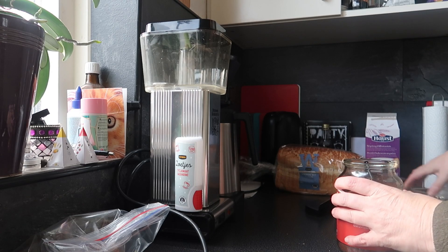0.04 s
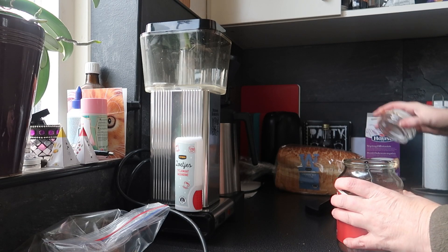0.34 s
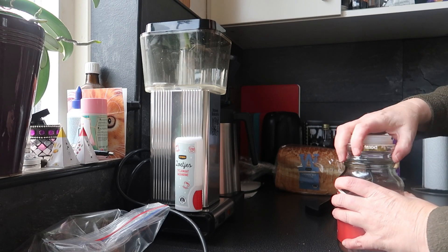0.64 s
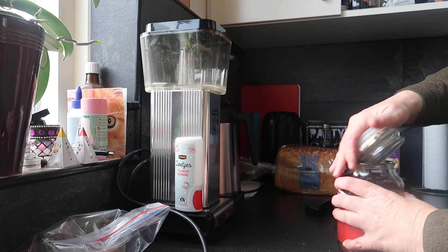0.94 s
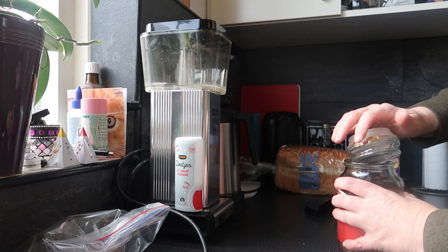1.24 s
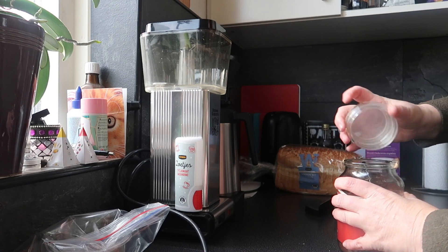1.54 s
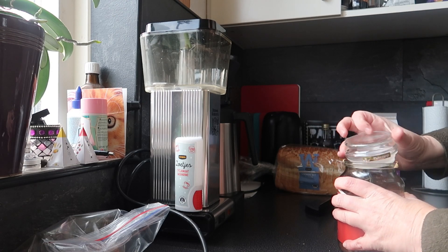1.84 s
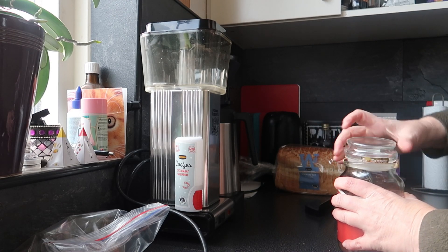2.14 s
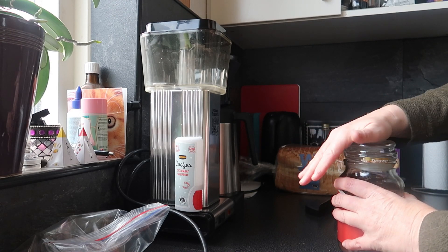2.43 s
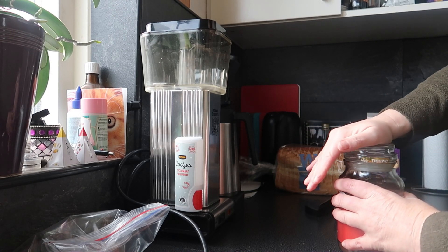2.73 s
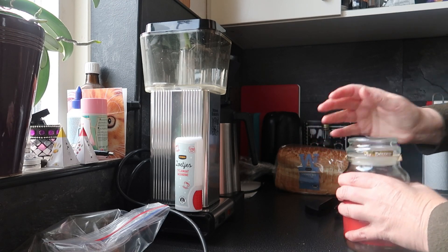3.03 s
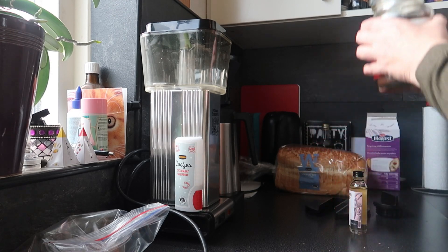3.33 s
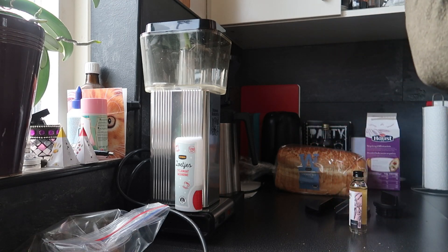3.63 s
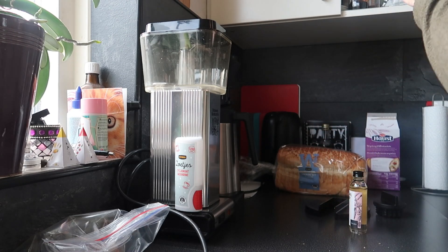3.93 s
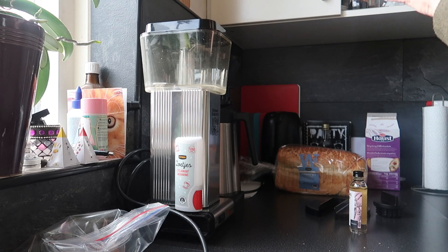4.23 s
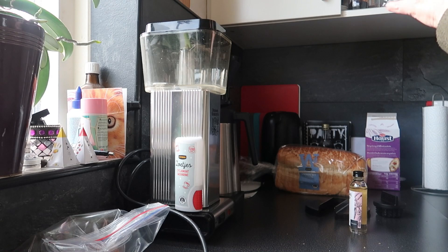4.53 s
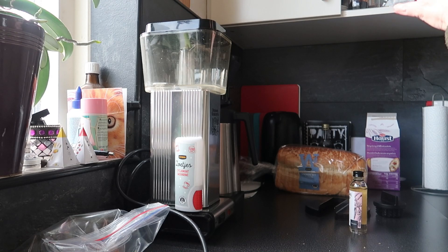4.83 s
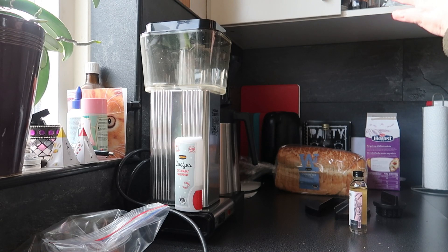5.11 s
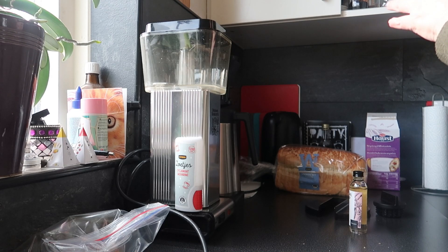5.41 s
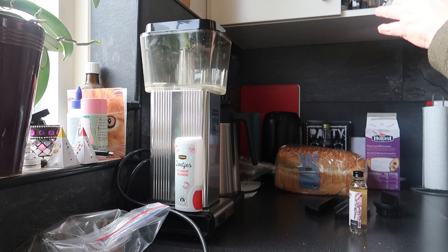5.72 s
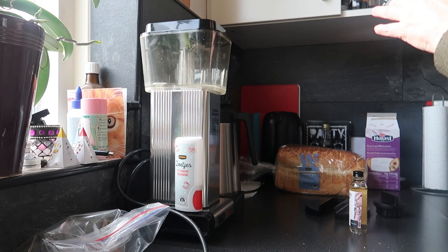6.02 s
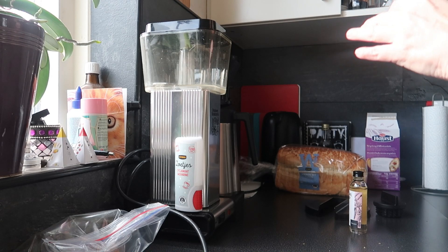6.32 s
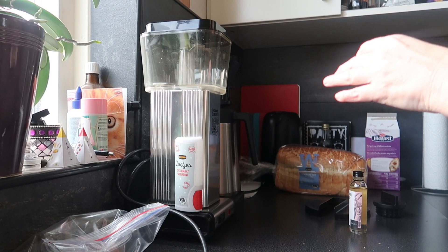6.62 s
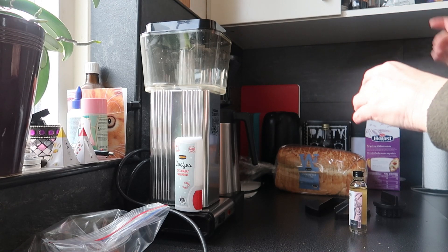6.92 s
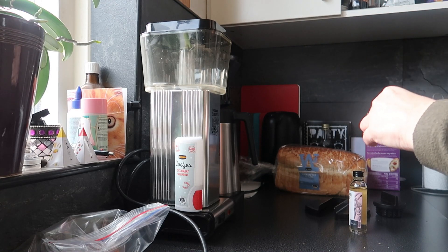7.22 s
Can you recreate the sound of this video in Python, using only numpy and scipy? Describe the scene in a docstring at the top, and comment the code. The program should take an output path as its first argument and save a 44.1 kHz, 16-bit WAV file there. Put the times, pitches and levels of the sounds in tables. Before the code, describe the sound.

A brief scrape of glass on the counter comes at about 0.2 seconds. At 0.65 a glass lid clinks loudly on the rim of a jar with a short bright ring, then clacks and scrapes again around 1.0 and 1.45. At 1.85 the plastic seal closes with a loud hollow pop and a tiny creak, followed by two clicking knocks up to 2.1. A palm presses the lid down with dull thumps through the counter at 2.5 and, harder, at 2.7. A sleeve rustles faintly during a lull. At 4.5 a light container is rapped, and around 4.9 the jar bumps onto a cupboard shelf with a short clatter and a high glass tinkle. Soft hollow taps and slides follow from 5.6 to 6.3, then faint cloth movement until about 7.3. The sounds are close, in a small kitchen with a faint electrical hum throughout.

```python
"""Closing and shelving a coffee jar

A glass lid clinks and scrapes on the rim of a jar; its plastic seal creaks, pops and knocks home, and
a palm thumps it down on the kitchen counter. A sleeve rustles as the jar is set on a cupboard shelf,
where things are shifted about. Impacts excite damped modes, and friction is a train of tiny slips.
Mains hum and a small room lie under it all, ducked by a limiter after the hardest blows."""
import sys
import numpy as np
from scipy import signal
from scipy.fft import rfft, irfft
from scipy.io import wavfile

SR = 44100
rng = np.random.default_rng(int(sys.argv[2]) if len(sys.argv) > 2 else 0)


def digitize_waveform(pressure):
    """Quantize a signal to 16-bit integers and store it at the path in sys.argv[1].

    Rows of a 2-D input are taken as channels; values are limited to [-1, 1].
    """
    field = np.atleast_2d(pressure).T
    bounded = np.clip(field, -1, 1)
    quanta = np.round(bounded * 32767).astype(np.int16)
    wavfile.write(sys.argv[1], SR, quanta)


N = 320166
TIME = np.arange(N) / SR


def amp(db):
    """Amplitude ratio of a level in decibels."""
    return 10 ** (np.asarray(db) / 20)


def read(points, hz):
    """Interpolation of a table along a logarithmic frequency axis."""
    f, value = np.transpose(points)
    return np.interp(np.log(hz + 1), np.log(f), value)


def unit(x):
    """Normalisation of each channel to unit energy."""
    return x / np.sqrt(np.sum(x ** 2, -1, keepdims=True) + 1e-20)


def add(mix, start_s, sound):
    """Superposition of a sound on the mix."""
    part = mix[:, max(round(start_s * SR), 0):][:, :sound.shape[1]]
    part += sound[:, :part.shape[1]]


def colour(x, points, size=4096):
    """Minimum-phase filtering to a given spectrum: no response precedes its cause."""
    log_gain = np.log(amp(read(points, abs(np.fft.fftfreq(size, 1 / SR)))))
    taps = np.fft.ifft(np.exp(np.conj(signal.hilbert(log_gain)))).real[:size // 2]
    return signal.oaconvolve(x, taps[None], axes=1)[:, :x.shape[1]]


def smooth(x, time_s):
    """Exponential averaging with time constant time_s."""
    keep = np.exp(-1 / (time_s * SR))
    return signal.lfilter([1 - keep], [1, -keep], x)


def ports(pair, side_db):
    """Mid and side to left and right: a side signal in quadrature gives close ports a phase difference."""
    side = irfft(1j * rfft(pair[1]) * amp(read(side_db, np.fft.rfftfreq(N, 1 / SR))), N)
    return np.array([pair[0] + side, pair[0] - side])


def decay(t, t60, rise_s):
    """Exponential damping, 60 dB in t60 seconds, after a smooth onset."""
    return amp(-60 * t / t60) * (1 - np.exp(-t / rise_s))


def strike(blows, body, modes, push, rise_s=0.00088, size=20000):
    """Impact: a force pulse and its rebounds, filtered by the body, make a clack; damped tones ring on."""
    # Force spectra of the first contact and of the rebounds: (frequency [Hz], level [dB])
    pulse_spectrum = [(500, -5), (1500, -8.5), (5000, -21.5)]
    chatter_spectrum = [(150, -9.5), (400, -1), (1000, -3)]
    out, t = np.zeros((2, N)), np.arange(size) / SR
    hz, db, ring_t60 = np.transpose(modes)[:, :, None]
    first_contact = push * colour(signal.unit_impulse(size)[None], pulse_spectrum)
    for start_s, level_db, treble_db, bass_db, chatter_t60 in blows:
        rebounds = unit(rng.standard_normal((2, size)) * decay(t, chatter_t60, rise_s))
        force = first_contact + colour(rebounds, chatter_spectrum)
        clack = unit(colour(force, body))
        grip, spot_db = rng.standard_normal((2, len(modes), 1))
        shifted_hz = hz * (1 + 0.0015 * grip)  # the grip detunes the modes
        rings = unit(decay(t, ring_t60, rise_s) * np.sin(2 * np.pi * shifted_hz * t))
        rings *= amp(db + spot_db)  # energy relative to the clack; the spot struck favours some modes
        sound = clack + np.array([rings.sum(0), rng.choice([-1, 1], len(modes)) @ rings])
        hardness = [(280, bass_db), (600, 0.0016), (1200, 0.0089),
                    (3000, 0.42 * treble_db), (9000, treble_db)]
        gain = amp(level_db) * np.sqrt(SR / 100)  # level counts over 10 ms
        add(out, start_s, gain * colour(sound, hardness))
    return out


def strokes(rows, attack_s, swell_db, release_s):
    """Amplitude envelope: each stroke takes hold, changes by swell_db to its level, then decays."""
    gain = np.zeros(N)
    for start, length, level_db in rows:
        t = TIME - start
        pressing = amp(level_db + swell_db * (np.clip(t / length, 0, 1) - 1))
        release = np.exp(-np.maximum(t - length, 0) / release_s)
        gain += np.clip(t / attack_s, 0, 1) * pressing * release
    return gain


def flow(drive, spectrum, gain):
    """Source and filter: a steady drive is coloured, brought to unit RMS and scaled by gain."""
    return unit(colour(drive, spectrum)) * np.sqrt(N) * gain


def friction(gain, spectrum, slips_per_s, spread_db, hiss):
    """Stick-slip friction: a Poisson train of tiny, uneven slips over a smooth hiss."""
    slips = rng.random(N) < slips_per_s / SR
    sizes = amp(spread_db * np.minimum(rng.exponential(1, N), 3))
    crackle = unit(slips * sizes * rng.choice([-1, 1], (2, N)))
    return flow(crackle + hiss * unit(rng.standard_normal((2, N))), spectrum, gain)


def kitchen(x, wet_db, echo_db, boom_db, size=30000):
    """Room response: direct sound, early reflections, standing waves and a diffuse tail."""
    # Reverberation time: (frequency [Hz], t60 [s])
    room_t60 = [(100, 0.54), (260, 0.45), (700, 0.53), (1800, 0.47), (3000, 0.38), (5000, 0.5),
                (8000, 0.023), (14000, 0.34)]
    # Standing waves: (frequency [Hz], relative peak [dB], t60 [s])
    standing_waves = [(112, 9, .36), (149, 8, .36)]
    # Reflections from counter, wall and cupboards: (delay [s], relative gain [ratio])
    echoes = [(.0022, 0.012), (.0046, -0.075), (.008, 0.027), (0.012, .28), (0.017, 0.44)]
    t = np.arange(size) / SR
    hz, frame_s, bands = signal.stft(rng.standard_normal((2, size)), SR, nperseg=256)
    bands *= amp(-60 * frame_s / read(room_t60, hz)[:, None])
    tail = signal.istft(bands, SR, nperseg=256)[1][:, :size]
    response = amp(wet_db) * unit(tail * (1 - np.exp(-t / 0.0008)) ** 2)
    for mode_hz, db, t60 in standing_waves:
        swell = decay(t, t60, rise_s=0.0054)
        response += 2 * amp(db + boom_db) * swell / swell.sum() * np.cos(2 * np.pi * mode_hz * t)
    response[:, 0] += 1  # direct sound
    for delay_s, gain in echoes:
        response[:, round(delay_s * SR)] += gain * amp(echo_db)
    return signal.oaconvolve(x, response, axes=1)[:, :N]


def background():
    """Noise floor: broadband room air and the harmonics of an appliance's mains hum."""
    # Room air: (frequency [Hz], relative density [dB])
    spectrum = [(15, -49), (25, -16.5), (103, -7), (128, -8), (202, -10.5), (501, -18.5), (879, -19.5),
                (1030, -23), (1210, -21), (1350, -26), (1760, -24), (9020, -41.5), (15000, -52)]
    # Its stereo width: (frequency [Hz], side gain [dB])
    width = [(60, -22), (130, -9), (300, 1.5), (1000, -1), (3000, -2), (8000, 0.5), (14000, 1.5)]
    # Hum: (frequency [Hz], RMS level [dB])
    harmonics = [(100, -54), (200, -64.5), (300, -66.5)]
    air = flow(rng.standard_normal((2, N)), spectrum, amp(-52.5))
    hum = sum(np.sqrt(2) * amp(db) * np.sin(2 * np.pi * (hz * TIME + rng.random()))
              for hz, db in harmonics)
    return ports(air, width) + hum


def draught():
    """Air displaced by the passing hand makes a puff of low-frequency noise."""
    # Puff: (time [s], duration [s], level [dB])
    puffs = [(6.64, 0.15, -46.5)]
    # Moving air: (frequency [Hz], relative density [dB])
    spectrum = [(15, -3.5), (42, 2), (70, -15), (130, -14), (300, -29.5), (1000, -68)]
    gain = strokes(puffs, attack_s=0.062, swell_db=-9.5, release_s=0.12)
    return flow(rng.standard_normal((2, N)), spectrum, gain)


def sleeve_rustle():
    """Friction of cloth gives broadband noise as the arm moves."""
    # Arm movements: (time [s], duration [s], level [dB])
    swishes = [(2.5, 0.51, -56), (3.05, 0.35, -54), (3.42, 0.19, -52.5), (4.5, 0.34, -51),
               (5.59, 0.33, -50), (6.1, 0.21, -48.5), (6.83, 0.1, -56.5), (7.0, 0.31, -61.5)]
    # Cloth: (frequency [Hz], relative density [dB])
    spectrum = [(120, -13), (200, 5), (272, -10), (326, -8.5), (602, -6), (912, -5), (3010, -9),
                (11600, -32), (15000, -48)]
    gain = strokes(swishes, attack_s=0.02, swell_db=3, release_s=0.069)
    return friction(gain, spectrum, slips_per_s=450, spread_db=-3, hiss=1)


def finger_rub():
    """Skin sticks and slips on the jar as the fingers shift."""
    # Changes of grip: (time [s], duration [s], level [dB])
    grips = [(0, 0.12, -44), (.88, 0.077, -32), (2.455, 0.049, -37), (2.69, 0.064, -32), (3.05, 0.018, -37)]
    # Skin on glass: (frequency [Hz], relative density [dB])
    spectrum = [(100, -21), (310, 7), (550, -15.5), (1200, -17.5), (5000, -34.5), (14000, -58.5)]
    gain = strokes(grips, attack_s=0.0038, swell_db=2, release_s=0.028)
    return friction(gain, spectrum, slips_per_s=400, spread_db=2.5, hiss=0.48)


def shelf_slides():
    """Sliding friction of things pushed along the shelf."""
    # Pushes: (time [s], duration [s], level [dB])
    slides = [(4.55, 0.16, -47.5), (4.86, 0.05, -44), (5.64, 0.25, -49.5), (5.81, 0.03, -50),
              (5.877, 0.033, -35.5), (6.12, 0.212, -52.5)]
    # Rubbed shelf: (frequency [Hz], relative density [dB])
    spectrum = [(50, -10), (115, 0), (180, -16), (260, 3.5), (370, -10.5), (530, -3.5), (750, -9.5),
                (1200, -15.5), (3000, -24), (5000, -32.5), (10000, -49)]
    gain = strokes(slides, attack_s=0.0034, swell_db=-2, release_s=0.026)
    return friction(gain, spectrum, slips_per_s=330, spread_db=6, hiss=0.8)


def box_taps():
    """A hollow box resonates briefly when tapped along the shelf."""
    # Taps: (time [s], level [dB], treble [dB], bass [dB], chatter t60 [s])
    taps = [(5.6045, -36.5, -5.5, 0, 0.031), (5.654, -44, 3, -6, 0.03), (5.812, -40.5, 3, -5, .04),
            (5.880, -30, 0, -2, 0.041), (5.904, -40, 9, 4.5, .03), (5.928, -36, 3, -18, 0.043),
            (6.084, -43.5, 3, -9, 0.036)]
    # Clack of the box: (frequency [Hz], relative density [dB])
    body = [(50, -22.5), (110, 25.5), (170, -28.5), (260, 14.5), (400, -0.5), (600, 1), (850, -0.5),
            (1300, -11), (3200, -8), (5000, -24), (12000, -43.5)]
    # Its modes: (frequency [Hz], relative energy [dB], t60 [s])
    modes = [(536, -5.5, 0.1), (643, -21, 0.083), (780, -33.5, 0.047)]
    return strike(taps, body, modes, push=0.54)


def container_raps():
    """Impacts excite the quickly damped modes of a light container nudged aside."""
    # Raps: (time [s], level [dB], treble [dB], bass [dB], chatter t60 [s])
    raps = [(4.5235, -21, -5, -8.5, 0.085), (4.632, -34, 4, 11, 0.055)]
    # Clack of the container: (frequency [Hz], relative density [dB])
    body = [(60, -5), (110, 6.5), (300, -8), (950, -7.5), (1300, 1), (1700, -4), (2300, 3.5), (3300, -4.5),
            (4800, -14), (6500, -24.5), (14000, -46)]
    # Its modes: (frequency [Hz], relative energy [dB], t60 [s])
    modes = [(1315, -20, 0.082), (2150, -17.5, 0.049), (2840, -23, 0.069)]
    return strike(raps, body, modes, push=0.44)


def glass_tinkles():
    """A small glass, touched by the jar, vibrates at its high natural frequencies."""
    # Touches: (time [s], level [dB], treble [dB], bass [dB], chatter t60 [s])
    touches = [(4.928, -21, -9, 0, 0.027), (5.092, -45.5, -11, 0.5, 0.0365)]
    # Clack of the glass: (frequency [Hz], relative density [dB])
    body = [(1000, -31), (3500, -1), (4600, 6), (5250, 16), (5700, -6), (6150, -12), (6600, -31),
            (7500, -12), (8500, -27), (14000, -48)]
    # Its modes: (frequency [Hz], relative energy [dB], t60 [s])
    modes = [(4910, -9, .1), (5103, -7, .12), (5265, -7, .13), (5335, -13, .18), (5480, -12, .14),
             (6140, -7, .06), (7380, -13, .09), (7490, -10, .08), (7924, -17, .09), (8720, -22, .08),
             (10500, -18, .1), (11000, -24, .1)]
    return strike(touches, body, modes, push=0.23)


def shelf_bumps():
    """Impacts of the jar and its neighbours set the shelf vibrating."""
    # Bumps: (time [s], level [dB], treble [dB], bass [dB], chatter t60 [s])
    bumps = [ (4.490, -45, 11, 13, 0.033), (4.8527, -35, 13.5, 5, 0.028), (4.9035, -18.5, -2.5, 6, 0.024),
             (4.9085, -10, 0, 2, 0.04), (4.931, -20.5, 2.5, 16.5, 0.1), (5.021, -23, -6, 2.5, 0.12),
             (5.0797, -20.5, -22, 3, 0.036), (5.160, -38, 2.5, 10, 0.026)]
    # Clack of the shelf: (frequency [Hz], relative density [dB])
    body = [(40, -36.5), (120, -6.5), (220, -23), (340, -7), (600, 1.5), (1100, 0), (1500, -1.5),
            (2800, -5.5), (4000, -17.5), (6000, -24.5), (10500, -43.5), (13000, -69)]
    # Its modes: (frequency [Hz], relative energy [dB], t60 [s])
    modes = [(219, -8, .11), (420, -16, .15), (655, -18, .1), (700, -15, .14), (969, -19, .14),
             (1250, -15, .07), (1430, -11, .09), (1600, -15, .06), (1940, -19, .07), (2546, -20, .15),
             (2869, -16, .15), (3260, -18, .12)]
    return strike(bumps, body, modes, push=0.28)


def counter_thumps():
    """Force transmitted through the jar excites the low modes of the counter."""
    # Thumps: (time [s], level [dB], treble [dB])
    thumps = [(0.147, -37.5, -9), (0.227, -42, 2.5), (2.485, -23.5, -8), (2.625, -38, -20),
              (2.718, -18, -10), (2.727, -11, -22), (3.086, -37.5, -2)]
    # Thud of the counter: (frequency [Hz], relative density [dB])
    body = [(20, -16.5), (45, -1.5), (75, -6.5), (105, -5.5), (150, 8), (250, -19.5), (450, -21.5),
            (1000, -31), (4000, -56)]
    # Its modes: (frequency [Hz], relative energy [dB], t60 [s])
    modes = [(113.35, -8.5, 0.11), (167, -6.5, 0.12), (213.6, -13.5, 0.34)]
    bass_db, chatter_t60 = -0.5, 0.066
    return strike([(*row, bass_db, chatter_t60) for row in thumps], body, modes, push=0.41)


def glass_scrapes():
    """Friction of glass on the counter and the rim grows as the hand presses harder."""
    # Scrapes and a last faint brush: (time [s], duration [s], level [dB])
    scrapes = [(.044, 0.04, -44.5), (.226, 0.031, -21), (1.01, 0.048, -21.5), (1.236, 0.015, -29.5),
               (1.262, 0.047, -23.5), (1.412, 0.025, -30.5), (6.86, 0.082, -62)]
    # Dragged glass: (frequency [Hz], relative density [dB])
    spectrum = [(100, -20), (300, -2.5), (550, -1), (750, 1.5), (1100, -1), (1600, -8), (2500, -17.5),
                (3600, -29), (5000, -33), (9000, -58), (14000, -64)]
    gain = strokes(scrapes, attack_s=0.0056, swell_db=4.5, release_s=0.00612)
    return friction(gain, spectrum, slips_per_s=1100, spread_db=-3.5, hiss=0.55)


def seal_creak():
    """Stick-slip motion of the plastic seal down the neck."""
    # Creak: (time [s], duration [s], level [dB])
    creaks = [(1.90, 0.039, -36)]
    # Plastic on glass: (frequency [Hz], relative density [dB])
    spectrum = [(300, -11), (1500, 1), (3000, 10), (4500, 5), (7000, -10), (14000, -29.5)]
    gain = strokes(creaks, attack_s=0.0043, swell_db=7, release_s=0.008)
    return friction(gain, spectrum, slips_per_s=490, spread_db=10.5, hiss=0.47)


def rib_snaps():
    """Elastic release: the ribs of the seal snap past the glass lip."""
    # Snaps: (time [s], level [dB], treble [dB], bass [dB], chatter t60 [s])
    snaps = [(1.912, -47, 2, 9, .012), (1.9215, -43, 0, 0, .008), (2.0815, -27.5, -5, 5, 0.012),
             (2.0925, -23, 0, 0, .01)]
    # Click of a rib: (frequency [Hz], relative density [dB])
    body = [(300, -18), (1000, -18), (2100, -23), (2450, -2), (2800, 6), (3400, -9), (4500, -6.5),
            (5500, -9.5), (7000, -27.5), (14000, -39)]
    # Its modes: (frequency [Hz], relative energy [dB], t60 [s])
    modes = [(2430, -17.5, 0.036), (2720, -7, .03), (4860, -18, 0.16), (5350, -16, 0.15)]
    return strike(snaps, body, modes, push=0.7)


def jar_knocks():
    """Dull impacts of the hands and the seating seal excite low, well-damped modes."""
    # Knocks: (time [s], level [dB], treble [dB], bass [dB], chatter t60 [s])
    knocks = [ (1.8465, -22.5, 1.5, 7.5, 0.072), (1.936, -30, -6, 15.5, 0.055),
              (1.9725, -12, -12, -4, 0.035), (2.018, -25.5, -19, 2.5, 0.044),
              (2.0925, -9.5, -7.5, -4, 0.058), (2.4785, -26, -9, -1, 0.017), (2.715, -22, -10.5, 0, 0.03),
              (3.0755, -38, 1, 7.5, 0.051)]
    # Clack of jar and seal: (frequency [Hz], relative density [dB])
    body = [(50, -24), (150, 8), (330, 5), (600, 0), (1030, -3.5), (1500, -12.5), (2600, -18),
            (3600, -25.5), (5300, -26.5), (7500, -54.5), (15000, -58)]
    # Their modes: (frequency [Hz], relative energy [dB], t60 [s])
    modes = [(312, -3, .1), (378, -2.5, .09), (450, -12, .08), (576, -17, .09), (700, -14, .05),
             (910, -13, .04), (1035, -6.5, .04)]
    return strike(knocks, body, modes, push=0.11)


def seal_pop(start_s=1.8465, level_db=-2.5):
    """Cavity resonance: the trapped air rings briefly as the seal closes the neck."""
    # Air modes: (frequency [Hz], relative level [dB], t60 [s])
    modes = [(301, 0, 0.1), (340, -3, .05), (377, -2, 0.09), (463, -11, .1), (721, -11, 0.044)]
    t = np.maximum(TIME - start_s, 0)
    return sum(amp(level_db + db) * decay(t, t60, rise_s=0.0038) * np.sin(2 * np.pi * hz * t)
               for hz, db, t60 in modes)


def lid_clinks():
    """Free vibration of glass: the loose lid rings on the rim; held or seated, it mostly clacks."""
    # A faint bright hiss (first row), then the clinks:
    # (time [s], level [dB], treble [dB], bass [dB], chatter t60 [s], ring gain [dB])
    clinks = [ (0.649, -34, 17, -3, 0.03, 2), (.656, -21.5, -1, 9.5, 0.019, -0.5),
              (0.6592, -3.5, 6.5, -2.5, 0.036, -2.5), (0.677, -13.5, 9, -13, 0.033, 1.5),
              (0.713, -6.5, -20.5, 7, 0.034, -4), (0.729, -8, -5.5, -6, 0.042, 4.5),
              (.963, -4.5, -9, -1.5, 0.1, -23), (0.9915, 0, -14.5, -0.5, 0.055, -10),
              (1.042, -15.5, -34, -20, 0.011, 11.5), (1.062, -13.5, -29, -0.5, 0.017, -14),
              (1.078, -11, -39, -12, 0.013, 9), (1.1016, -11.5, -26.5, 7, 0.028, 0.5),
              (1.386, -21.5, -57.5, 3, 0.02, -0.5), (1.437, -12, -8, -5.5, 0.037, -1.5),
              (1.447, -14, -6.5, -4, 0.033, -6), (1.4705, -8, -11, 6.5, 0.14, -11.5),
              (1.486, -10, -10.5, -11, 0.04, -13.5), (1.973, -9.5, -40, 4, 0.048, -19)]
    # Clack of the lid: (frequency [Hz], relative density [dB])
    body = [(50, -31.5), (95, -29.5), (150, -8.5), (230, -16.5), (350, -2.5), (520, -7), (850, 0),
            (1600, -7), (2100, -1), (2600, -1.5), (2900, 1.5), (3500, -12.5), (4100, -16.5), (4800, -9.5),
            (5300, -13), (6150, -32), (6750, -28.5), (7600, -40), (8800, -52.5), (14000, -65)]
    # Its ring, a main cluster and tones around it: (frequency [Hz], relative energy [dB], t60 [s])
    main_tones = [(2509, -27, .3), (2681, -20, .26), (2742, -20, .4), (2832, -13, .52), (2866, -15, .26),
                  (2908, -10, .26), (2928, -15, .3), (2958, -21, .6), (3004, -14.5, .34), (3050, -23, .15)]
    outer_tones = [(803, -23, 0.061), (1040, -18, 0.05), (3390, -29, .26), (4650, -28.5, 0.2),
                   (4790, -31.5, 0.4), (4760, -27, 0.21), (5103, -27.5, 0.26), (4750, -27.5, .35),
                   (5341, -26, 0.15)]
    # Faint high shimmer of close, short tones on each clink:
    # (frequency [Hz], relative energy [dB], t60 [s])
    shimmer = [(6681, -39, .2), (7219, -39, .11), (8301, -42, .06), (8802, -44, .06), (9464, -50, .13),
               (10050, -46, .11), (10280, -46, .11), (11640, -48, .1), (11900, -45, .09), (12053, -44, .1),
               (12230, -47, .09), (12700, -51, .06), (13964, -47, .12), (14120, -48, .1), (14290, -48, .08)]
    out = np.zeros((2, N))
    for *blow, ring_db in clinks:
        ringing = [(hz, db + ring_db, t60) for hz, db, t60 in main_tones + outer_tones]
        out += strike([blow], body, ringing + shimmer, push=0.97, size=26000)
    return out


def scene():
    """Superposition of all sources, each with its own balance of direct and reflected sound."""
    # Stereo width, greatest in the treble: (frequency [Hz], side gain [dB])
    width = [(60, -30), (250, -33), (500, -17), (1000, -19.5), (1800, -14.5), (2800, -10.5), (4000, -5),
             (8000, 4.5), (14000, 7)]
    lid = kitchen(lid_clinks(), wet_db=-6, echo_db=-5.5, boom_db=5.5)
    seal = kitchen(jar_knocks() + seal_pop(), wet_db=-8.5, echo_db=-3, boom_db=11.5)
    snaps = kitchen(rib_snaps(), wet_db=-10, echo_db=-6, boom_db=0.5)
    counter = kitchen(counter_thumps(), wet_db=-8.5, echo_db=-15.5, boom_db=-1)
    bumps, raps, tinkles, taps = shelf_bumps(), container_raps(), glass_tinkles(), box_taps()
    glassware = kitchen(tinkles, wet_db=-8.5, echo_db=2, boom_db=-9)  # deep in the cupboard: strong echoes
    cupboard = glassware + kitchen(bumps + raps + taps, wet_db=-6, echo_db=-7.5, boom_db=2)
    rubbing = glass_scrapes() + shelf_slides() + sleeve_rustle() + finger_rub() + seal_creak()
    rubs = kitchen(rubbing, wet_db=-6.5, echo_db=-19, boom_db=2)
    return ports(lid + seal + snaps + counter + cupboard + rubs + draught(), width) + background()


def limiter(x, threshold_db=-12.5, max_duck_db=12, recovery_db_per_s=4.5):
    """Gain reduction with fast attack and slow release: a loud blow ducks what follows."""
    power = smooth((x ** 2).mean(0), time_s=0.0051)
    over_db = np.clip(10 * np.log10(power + 1e-12) - threshold_db, 0, max_duck_db)
    recovery = recovery_db_per_s * TIME
    duck_db = np.maximum.accumulate(over_db + recovery) - recovery
    return x * amp(-smooth(duck_db, time_s=0.025))


def record(dry, low_hz=34, high_hz=15200):
    """Microphone chain: bass roll-off, limiting, clipping on overload and a band limit."""
    thinned = signal.sosfilt(signal.butter(3, low_hz, "highpass", fs=SR, output="sos"), dry)
    clipped = np.clip(limiter(thinned), -1, 1)
    lowpass = signal.firwin(401, high_hz, window=("kaiser", 8), fs=SR)
    return signal.oaconvolve(clipped, lowpass[None], "same", axes=1)


dry = scene()
out = record(dry)
digitize_waveform(out)
```